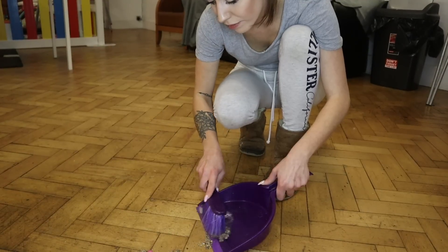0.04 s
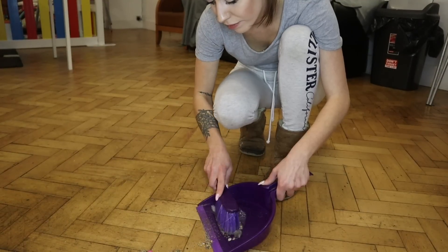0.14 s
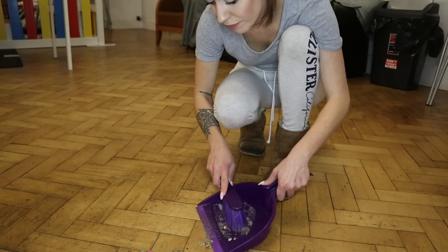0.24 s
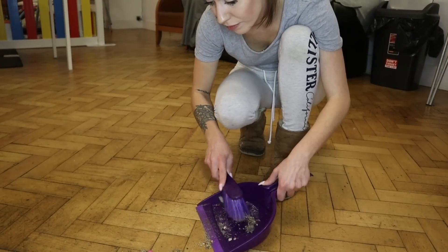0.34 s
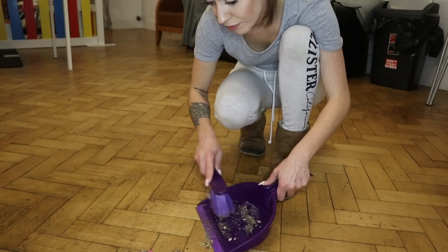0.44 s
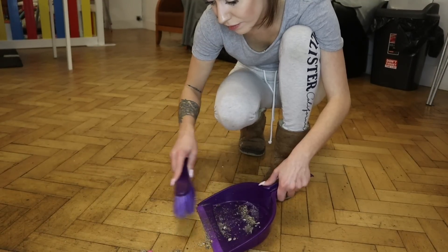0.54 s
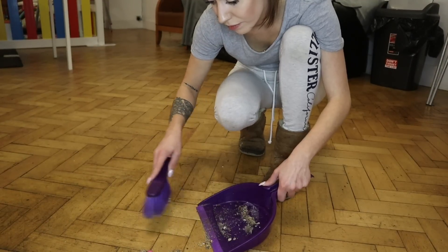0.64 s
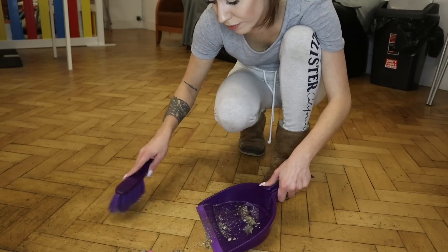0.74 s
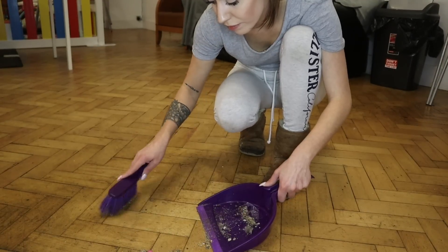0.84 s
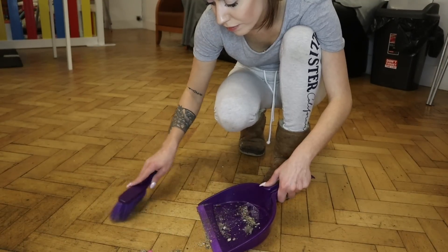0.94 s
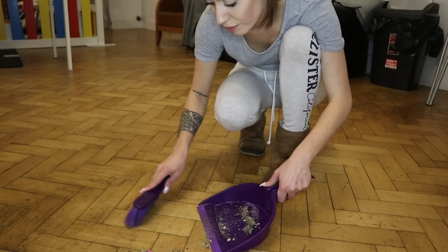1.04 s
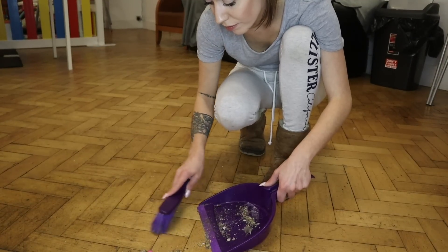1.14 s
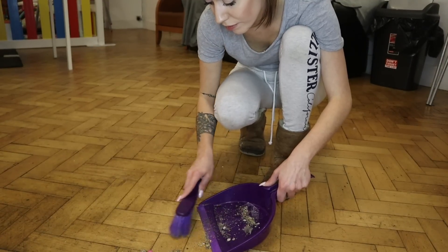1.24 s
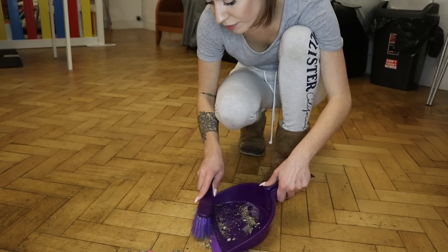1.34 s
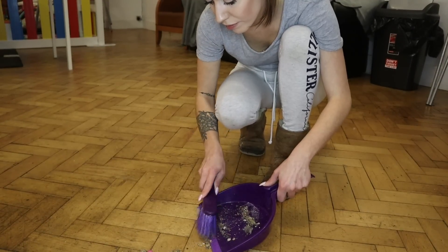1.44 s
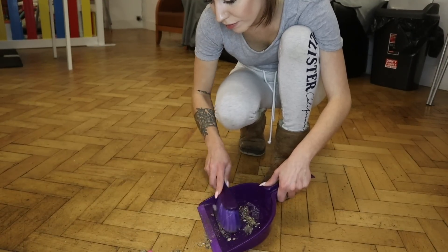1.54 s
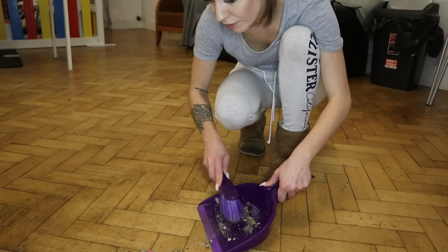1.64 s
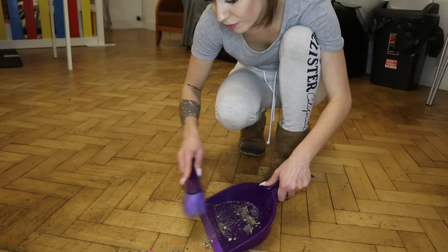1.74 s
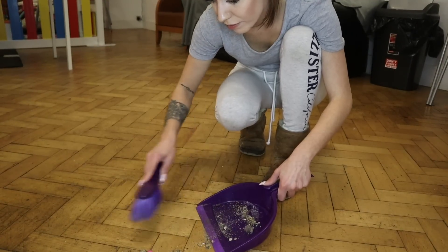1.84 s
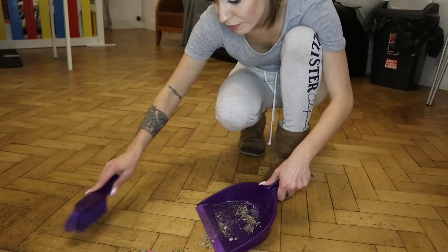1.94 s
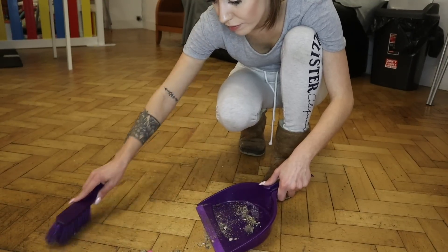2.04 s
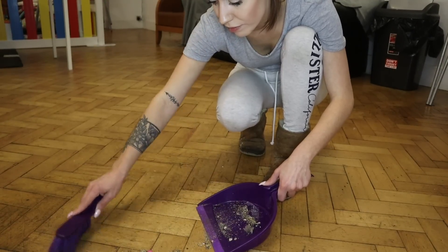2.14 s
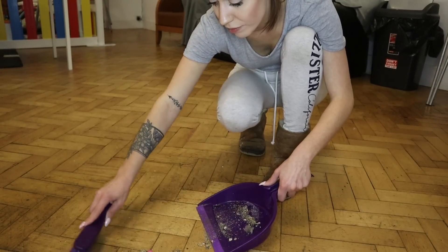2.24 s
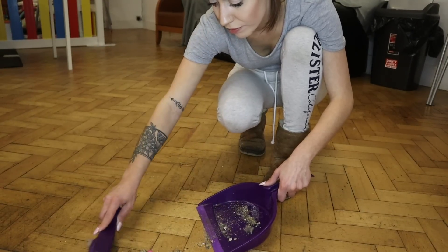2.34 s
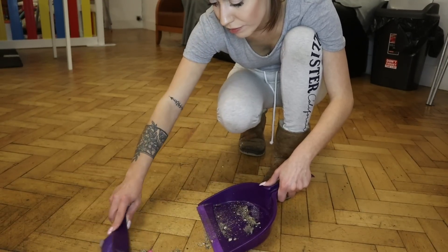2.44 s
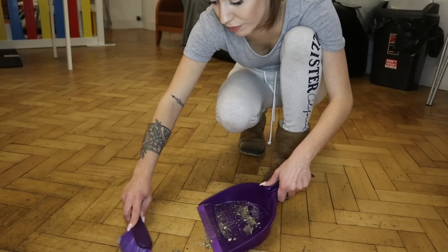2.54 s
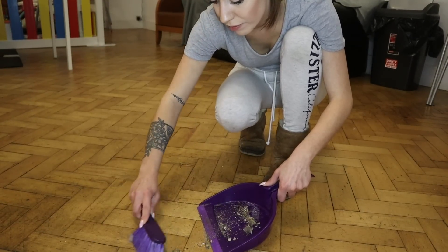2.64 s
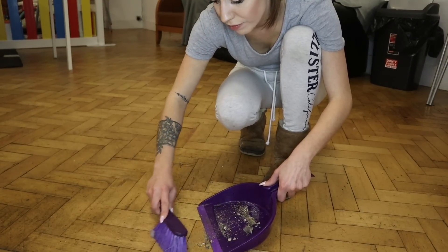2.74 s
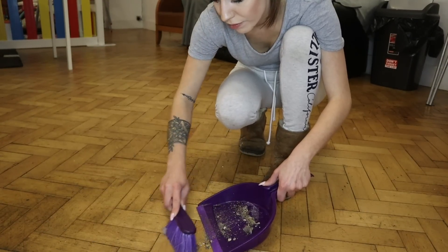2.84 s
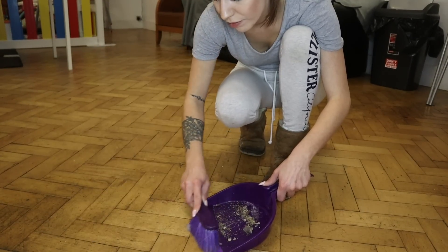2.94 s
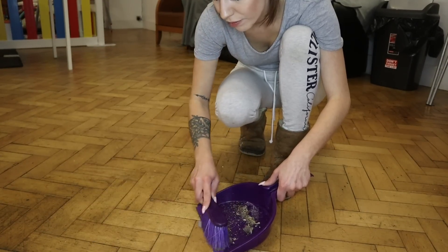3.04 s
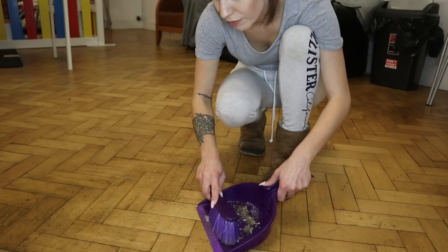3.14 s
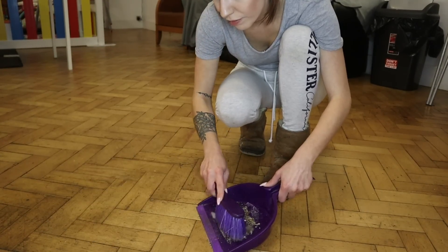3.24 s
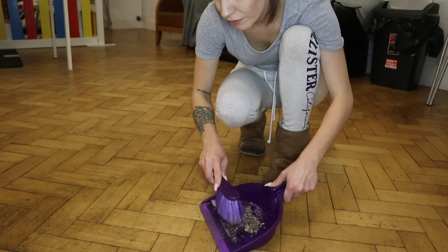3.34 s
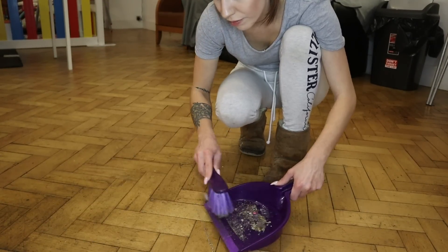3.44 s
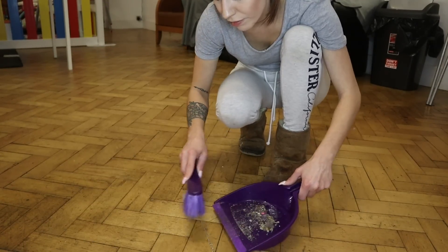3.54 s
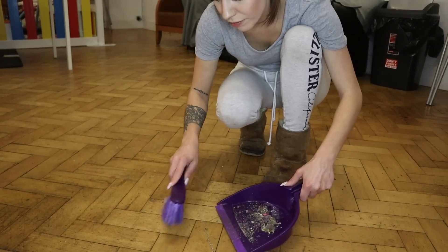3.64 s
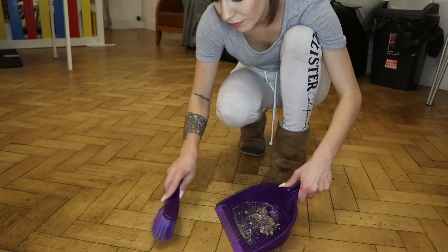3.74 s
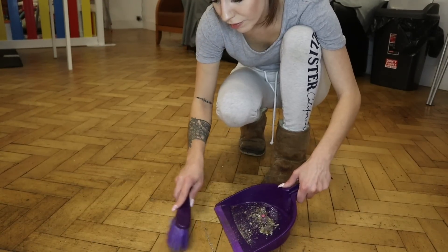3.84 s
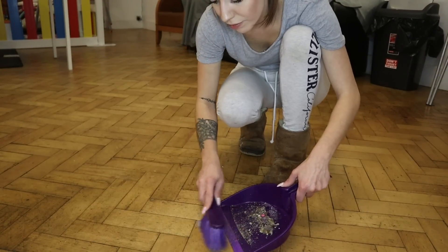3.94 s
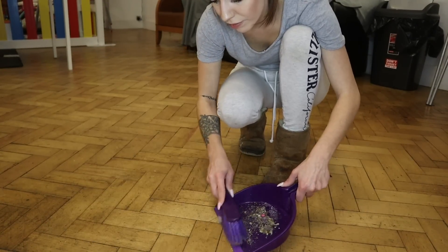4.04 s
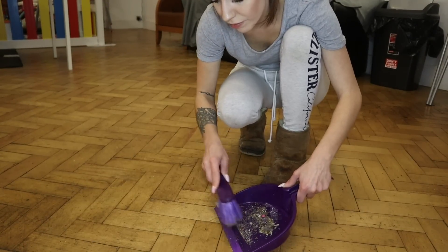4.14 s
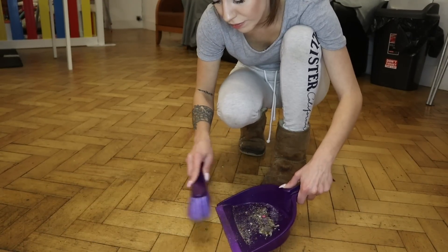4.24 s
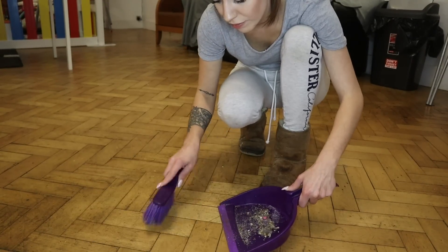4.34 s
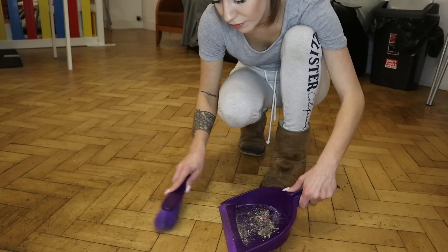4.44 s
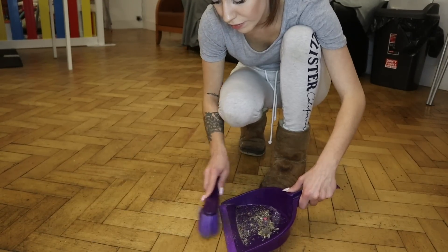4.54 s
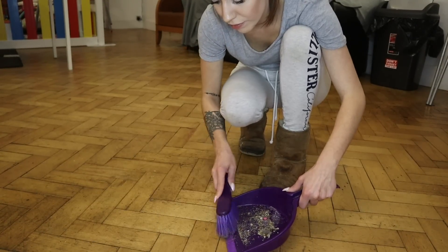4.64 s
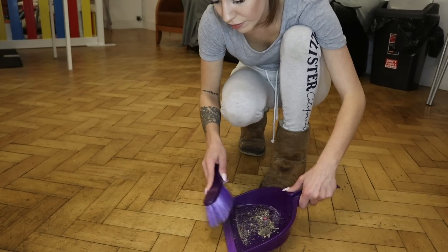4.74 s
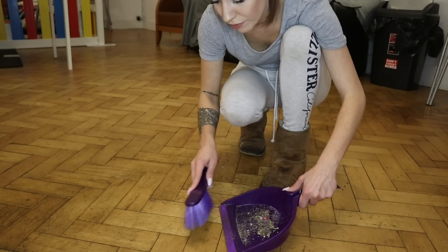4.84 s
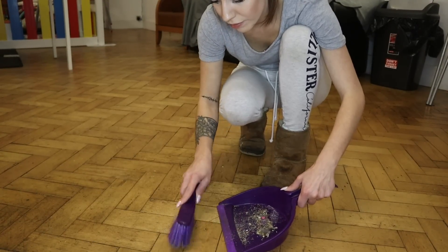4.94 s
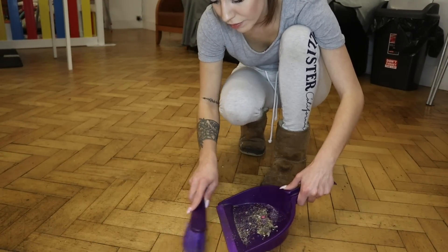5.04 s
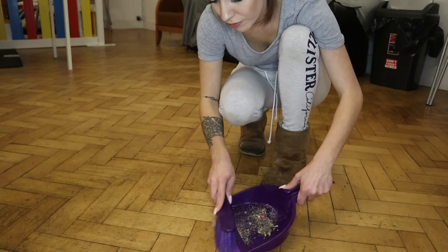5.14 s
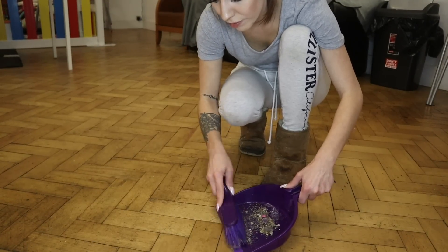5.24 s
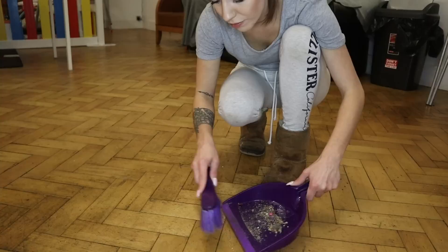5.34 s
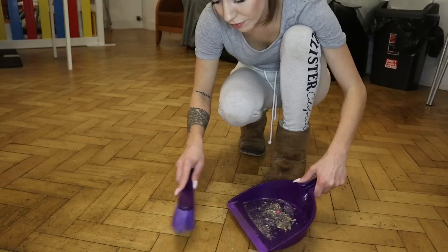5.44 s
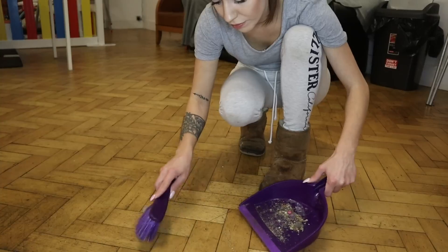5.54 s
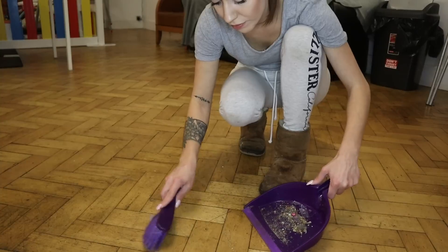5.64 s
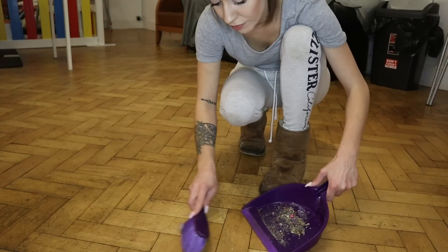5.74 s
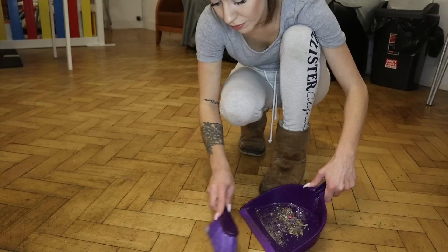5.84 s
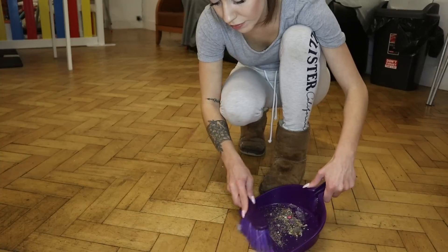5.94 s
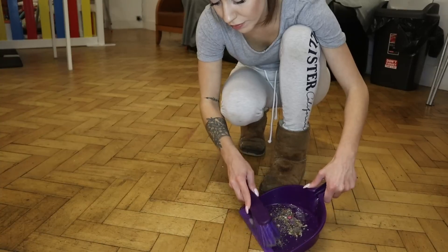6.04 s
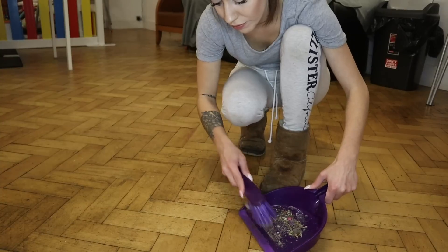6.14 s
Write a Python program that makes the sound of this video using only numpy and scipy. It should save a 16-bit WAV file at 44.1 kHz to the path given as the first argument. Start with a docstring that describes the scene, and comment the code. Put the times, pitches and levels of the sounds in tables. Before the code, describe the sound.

A hand brush sweeps grit across a wooden floor in brisk hissing strokes and flicks it, ticking, into a plastic dustpan.

```python
"""A hand brush sweeps grit over a parquet floor into a plastic dustpan, close by, in a fairly live room.
Each brisk stroke lands with a pat, hisses along the wood and flicks over the lip of the pan: trains of random
clicks, coloured and swelled by the hand. Inside the pan, bristles scrape and grit ticks on the plastic: clicks
and pulses that ring its modes. Far off, an engine drones faintly in the street: sine tones of falling pitch,
over a murmur and a steady hiss of filtered noise."""
import sys
import numpy as np
from scipy import signal
from scipy.fft import rfft, irfft, next_fast_len
from scipy.io import wavfile
from scipy.ndimage import map_coordinates

SR = 44100
rng = np.random.default_rng(int(sys.argv[2]) if len(sys.argv) > 2 else 0)


def wrap_up_sound(samples):
    """Save the sound to the file named by the first command line argument, as 16-bit audio."""
    columns = np.atleast_2d(samples).T
    # keep every value between -1 and 1, then stretch to whole-number steps
    tamed = np.clip(columns, -1, 1)
    steps = np.round(tamed * 32767).astype(np.int16)
    wavfile.write(sys.argv[1], SR, steps)


N = 272538
TIME = np.arange(N) / SR

# strokes inside the pan, levels before trim: enter_s, hardest_push_s, leave_s, scrape_db, boom_db
PAN_STROKES = [(0.0, 0.17, 0.32, -30, -58), (1.39, 1.43, 1.426, -36.5, -52.5),
               (1.51, 1.622, 1.7, -36.5, -53), (3.06, 3.087, 3.15, -29, -50),
               (3.145, 3.244, 3.47, -28.5, -52)]
# modes of the plastic pan: mode_hz, width_hz, level_db
PAN_MODES = [(740, 125, -1), (1510, 230, -1), (1770, 120, -4), (2110, 130, -4), (2780, 170, -2),
             (3590, 190, -4), (4870, 220, -6)]
# colour of bristles and crumbs on the plastic: frequency_hz, level_db
FLICK_COLOUR = [(500, -34), (1400, -7.5), (3000, -4.5), (4200, -4.5), (6800, -4), (8500, -9.5),
                (12000, -7.5), (15500, -31.5)]
# stereo width of the brush, near the microphones: frequency_hz, side_minus_mid_db
NEAR_WIDTH = [(100, -10.5), (300, -14.5), (700, -26), (1400, -4.5), (4500, -2.5), (12000, -3)]
# stereo width of room and background, far from the microphones: frequency_hz, side_minus_mid_db
FAR_WIDTH = [(50, -48), (130, -17), (380, -6), (700, -4), (1400, -0.5), (8000, 11.5)]
ENTER_S = 0.0011  # the bristles meet the plastic


def floor_strokes(land_s=0.00045, relax_s=0.017, lift_s=0.037, bend_range_db=4, hiss_growth=0.52):
    """Bristles rub the wood and roll grit, most as the hand bears down; their tips hiss more with speed."""
    # strokes along the floor, levels before trim:
    # land_s, lift_s, bear_down_s, rub_at_end_of_bearing_down_db, light_drag_rub_db, full_speed_hiss_db
    stroke_table = [(0.944, 1.436, 0.1, -44, -45, -42), (2.126, 3.08, 0.17, -39.5, -45, -44.5),
                    (3.821, 4.208, 0.15, -38.5, -45.5, -40), (4.499, 4.77, 0.054, -39, -47.5, -36.5),
                    (5.056, 5.326, 0.066, -55, -45.5, -40.5), (5.678, 6.168, 0.26, -48, -65, -38)]
    # the tufts drag harder over a rough patch of wood: time_s, rub_db (before trim), half_length_s
    drag_table = [(2.306, -36.5, 0.026), (4.563, -43, 0.02), (5.161, -38.5, 0.027), (5.334, -37.5, 0.032),
                  (5.737, -39, 0.022), (5.876, -45.5, 0.04)]
    # colour of the rub on wood: frequency_hz, level_db
    rub_colour = [(150, -14), (350, 0.5), (750, 5), (1100, -1), (1650, 2.5), (3000, -2.5), (5000, -6),
                  (9000, -29.5)]
    # colour of the bristle tips: frequency_hz, level_db
    hiss_colour = [(1000, -25), (2500, 4.5), (4000, 2), (6500, 4.5), (8000, 2.5), (11500, 5), (13500, -6),
                   (15500, -17)]
    pressure, speed = 0, 0
    for land, lift, press_s, press_db, drag_db, hiss_db in stroke_table:
        contact = held(land, lift, land_s, lift_s)
        # the rub grows as the tufts bend under the hand
        bend_db = bend_range_db * np.clip((TIME - land) / press_s - 1, -1, 0)
        pressed = from_db(press_db + bend_db) * held(land, land + press_s, land_s, relax_s)
        pressure += np.hypot(pressed, from_db(drag_db) * contact)
        stroke_done = np.clip((TIME - land) / (lift - land), 0, 1)
        speed += from_db(hiss_db) * contact * stroke_done ** hiss_growth
    for s, db, half in drag_table:
        pressure += from_db(db) * np.exp(-np.minimum(((TIME - s) / half) ** 2, 20))

    rub = shifting(spread(slips(per_s=4000, size_db=2.0), NEAR_WIDTH, rub_colour))
    rub = rub * from_db(2.1 * drift(70))
    grit = spread(slips(per_s=260, size_db=2.5) * from_db(4 * drift(30)), NEAR_WIDTH, rub_colour)
    rub = rms_one(rub + from_db(-3) * grit)
    hiss = spread(slips(per_s=14000, size_db=1.5), NEAR_WIDTH, hiss_colour) * from_db(1.0 * drift(42))
    return from_db(-3.0) * rub * pressure + from_db(-3.0) * hiss * speed


def pan_strokes(scrape_ease_db_per_s=47, boom_ease_db_per_s=2):
    """Bristles push grit over the shell, which rings and booms in fits; loose crumbs rattle on it."""
    # colour of the booming pan: frequency_hz, level_db
    boom_colour = [(200, -45), (450, -10), (690, -2), (1050, -12), (1550, -1.5), (2800, -40)]
    # colour of bristles and grit scraping on plastic: frequency_hz, level_db
    scrape_colour = [(550, -18), (1350, -2.5), (2300, -4), (3500, -2), (5000, -13), (8000, -13),
                     (11500, -14.5), (15500, -50)]
    scraping = sum(from_db(db) * push(*times, scrape_ease_db_per_s) for *times, db, _ in PAN_STROKES)
    booming = sum(from_db(db) * push(*times, boom_ease_db_per_s) for *times, _, db in PAN_STROKES)

    grit = slips(per_s=1500, size_db=-1.5) * from_db(2.9 * drift(90))
    crumbs = slips(per_s=190, size_db=3.0)
    scrape = shifting(spread(grit + from_db(-2.0) * hollow(grit), NEAR_WIDTH, scrape_colour))
    rattle = spread(crumbs + ring(crumbs, PAN_MODES), NEAR_WIDTH, FLICK_COLOUR)
    scrape = scrape + from_db(-2.5) * rattle
    boom = shifting(spread(slips(per_s=900, size_db=3.0), NEAR_WIDTH, boom_colour))
    boom = rms_one(boom * from_db(3.5 * drift(40)))
    return from_db(-2.5) * scrape * scraping + from_db(10.0) * boom * booming


def push(enter, hardest, leave, ease_db_per_s, push_db_per_s=78, leave_s=0.039):
    """Force of one stroke in the pan: it grows up to the hardest push, eases and lets go."""
    db = np.minimum((TIME - hardest) * push_db_per_s, (hardest - TIME) * ease_db_per_s)
    return from_db(db) * held(enter, leave, ENTER_S, leave_s)


def hollow(x, mouth_hz=1080, back_hz=1680, travel_s=0.095, width_hz=300):
    """The hollow under the brush rises in pitch as each stroke travels from the mouth of the pan to its back."""
    enters = np.array([row[0] for row in PAN_STROKES])
    out, state, size = np.zeros_like(x), np.zeros((2, 2)), 128
    for i in range(0, N, size):
        inside_s = i / SR - enters[enters <= i / SR].max(initial=0)
        hz = back_hz + (mouth_hz - back_hz) * np.exp(-inside_s / travel_s)
        block = x[:, i:i + size]
        out[:, i:i + size], state = signal.lfilter(*resonance(hz, width_hz), block, zi=state)
    return out


def flicks(meet_s=0.078, meet_db=-14.0, fall_s=0.019):
    """The tufts rustle as they meet the lip, then spring free in a quick, fine-grained, bright swell."""
    # bristles flick over the lip: time_s, level_db, rise_s
    flick_table = [(0.189, -24, 0.03), (1.556, -33, 0.034), (1.626, -31, 0.018), (3.06, -39, 0.035),
                   (3.269, -25.5, 0.036), (4.143, -25.5, 0.031), (4.75, -24.5, 0.019),
                   (5.308, -29.5, 0.039), (6.115, -28, 0.036)]
    swell = 0
    for s, db, rise in flick_table:
        spring = np.exp(-np.minimum(np.maximum((s - TIME) / rise, (TIME - s) / fall_s), 20))
        rustle = from_db(meet_db) * held(s - meet_s, s, ENTER_S, fall_s)
        swell = swell + from_db(db) * np.maximum(spring, rustle)
    tufts = slips(per_s=16000, size_db=1.5)
    return swell * spread(tufts, NEAR_WIDTH, FLICK_COLOUR)


def pats(reach=2.35, side_db=-8.5, level_db=-10.0, tips_db=-19.5):
    """Many bristle ends touch down within milliseconds, a burst of noise that shakes the pan on the floor."""
    # the brush pats the floor or the pan: time_s, level_db (before trim), centre_hz, length_s
    pat_table = [(0.079, -26, 2060, 0.0037), (0.169, -18.5, 4500, 0.008), (0.21, -15, 2550, 0.0073),
                 (0.9612, -18, 1740, 0.0066), (1.407, -24, 2540, 0.0066), (1.604, -25.5, 2200, 0.024),
                 (2.146, -21.5, 1320, 0.011), (3.805, -25.5, 1210, 0.01), (3.815, -28, 1800, 0.021),
                 (3.889, -24.5, 1360, 0.014), (3.933, -30.5, 1810, 0.015), (4.504, -15.5, 1970, 0.0064),
                 (4.545, -33, 1800, 0.008), (5.074, -21, 1040, 0.013), (5.698, -25, 1930, 0.023),
                 (5.714, -26.5, 485, 0.017)]
    out, t = np.zeros((2, N)), TIME[:SR // 20]
    for s, db, hz, length in pat_table:
        burst = rng.choice([-1, 1], (2, len(t))) * (t / length) ** 2 * np.exp(-5.5 * t / length)
        body = from_db(-3) * ring(band(burst, 400, 1.5 * hz), PAN_MODES)
        tips = from_db(tips_db) * np.sqrt(hz / 1700) * band(burst, 3400, 9700)
        mid, side = band(burst, hz / reach, hz * reach) + tips + body
        pat = mid + from_db(side_db) * side * np.array([[1], [-1]])
        loudness = np.sqrt(np.sum(mid ** 2) / (length * SR))
        add(out, from_db(db + level_db) * pat / loudness, s)
    return out


def knocks(contact_s=0.0012, rattle_db=-10.5, low_hz=520, high_hz=3000,
           spot_width_hz=130, spot_db=5.5, dry_db=-5.0):
    """A blunt, slightly rattling contact drives the modes of the pan and the pitch of the struck spot."""
    # the brush stock bumps the pan and sets it ringing: time_s, peak_db, spot_hz
    knock_table = [(3.055, -17, 806), (3.068, -19, 735), (3.086, -17, 1480), (3.115, -21.5, 1800),
                   (3.141, -11, 1490), (3.152, -24, 1570), (3.170, -19.5, 730), (3.187, -14.5, 2860),
                   (3.19, -17.5, 730), (3.202, -22, 1600)]
    out, t = np.zeros((2, N)), TIME[:SR // 20]
    for s, db, hz in knock_table:
        rattle = rng.choice([-1, 1], (2, len(t))) * (t / contact_s) * np.exp(-t / contact_s)
        blow = band((t == 0) + from_db(rattle_db) * rattle, low_hz, high_hz)
        spot = ring(blow, [(hz, spot_width_hz, spot_db)])
        knock = ring(blow, PAN_MODES) + spot + from_db(dry_db) * blow
        add(out, from_db(db) * knock / np.abs(knock).max(), s)
    return out


def thumps(contact_s=0.00021):
    """Cushioned by its tufts, the stock comes down and the parquet answers with a short, woody note."""
    # the stock thumps on the floor: time_s, peak_db
    thump_table = [(0.2004, -26.5), (3.8085, -21.5), (3.821, -26.5), (5.077, -33), (5.15, -31.5)]
    # modes of the parquet: mode_hz, width_hz, level_db
    floor_modes = [(190, 184, -10), (551, 78, 1), (813, 200, -1.5)]
    t, out = TIME[:SR // 5], np.zeros((2, N))
    note = ring(t * np.exp(-t / contact_s), floor_modes)
    for s, db in thump_table:
        add(out, from_db(db) * note[None] / np.abs(note).max(), s)
    return out


def ticks(reach=1.7, scatter_db=-13.5, scatter_s=0.0016, ring_db=-30.0, crack_db=-22.0,
          spot_width_hz=450, spot_db=-6.0, level_db=0.5):
    """A hard contact is one sharp pulse, scattered at once by the pan walls; the struck spot rings briefly."""
    # the larger grit ticks on the plastic and the wood: time_s, peak_db (before trim), centre_hz
    tick_table = [(0.0226, -27, 2900), (0.0914, -13.5, 3130), (0.1432, -11, 4300), (0.1553, -13, 5500),
                  (0.1845, -1, 3630), (0.201, 0, 2100), (0.283, -6, 3070), (0.296, -19, 3080),
                  (0.3841, -20, 3400), (0.517, -25, 2400), (0.5237, -27, 1730), (0.5345, -24, 2300),
                  (1.3987, -18, 3640), (1.4595, -26, 3980), (1.544, -20, 4490), (1.5544, -18, 4900),
                  (1.6245, -18, 3740), (1.6308, -8.5, 3300), (1.6562, -13.5, 3500), (1.683, -21, 2600),
                  (2.6963, -21.5, 3280), (2.8364, -22.5, 2900), (2.8466, -24.5, 2400),
                  (2.8702, -17.5, 3000), (2.8759, -22, 3290), (3.1625, -17, 2800), (3.172, -10, 3700),
                  (3.373, -22, 3200), (3.4285, -25, 3600), (3.551, -27, 1500), (3.6798, -30, 2300),
                  (3.7299, -26, 3300), (4.993, -22, 2900), (5.0102, -29, 4500), (5.7252, -12, 2300),
                  (6.1643, -19.5, 4540)]
    out, t = np.zeros((2, N)), TIME[:SR // 20]
    for s, db, hz in tick_table:
        scatter = rng.choice([-1, 1], (2, len(t))) * np.exp(-t / scatter_s)
        scatter = scatter * np.minimum(2 * t / scatter_s, 1)
        pulse = (t == 0) + from_db(scatter_db) * scatter
        crack = from_db(crack_db) * (hz / 3000) ** 2 * band(pulse, 7100, 9800)
        spot = ring(pulse, [(hz, spot_width_hz, spot_db)])
        tick = band(pulse, hz / reach, hz * reach) + crack
        tick = tick + from_db(ring_db) * ring(pulse, PAN_MODES) + spot
        add(out, from_db(db + level_db) * tick / np.abs(tick.mean(axis=0)).max(), s)
    return out


def shifting(x, spots_per_s=16, spot_colour_db=3.0):
    """Each spot of wood or plastic under the brush favours other pitches, so the colour keeps shifting."""
    edges = np.geomspace(350, 4400, num=12)
    change = 0
    for low, high in zip(edges, edges[1:]):
        change = change + band(x, low, high) * (from_db(spot_colour_db * drift(spots_per_s)) - 1)
    return rms_one(x + change)


def slips(per_s, size_db):
    """Bristles catch and let go at random: two trains of tiny clicks of uneven size and random sign."""
    sizes = from_db(size_db * np.minimum(rng.exponential(1, (2, N)), 5))
    return rms_one((rng.random((2, N)) < per_s / SR) * sizes * rng.choice([-1, 1], (2, N)))


def placed(x, pan_db=1.15, lead_s=2e-5):
    """The side nearer to the brush hears it louder and a little sooner."""
    # where the brush is: time_s, place (-1 far out on the left .. 1 at the pan, on the right)
    place_table = [(0.4, 1), (0.95, -1.15), (1.55, 0.99), (2.25, -0.81), (2.65, -1.44), (3.15, 1),
                   (3.8, 0.78), (6.1, 0.66)]
    place = np.interp(TIME, *np.transpose(place_table))
    channels = []
    for side, channel in zip((-1, 1), x):
        heard = map_coordinates(channel, [(TIME + side * lead_s * place) * SR], order=3)
        channels.append(from_db(side * pan_db * place) * heard)
    return np.array(channels)


def room(x, gap_s=0.0013, treble_db=-6.0):
    """Diffuse reflections, as decaying noise, build up after a short gap; the treble returns weaker."""
    # room decay: frequency_hz, t60_s
    decay_table = [(200, 0.79), (1500, 1), (4000, 0.66), (12000, 0.92)]
    t, edges, tail = TIME[:SR], np.geomspace(100, 16000, num=9), 0
    for low, high in zip(edges, edges[1:]):
        hz = np.sqrt(low * high)
        gain = from_db(at_hz([(2500, 0), (11000, treble_db)], hz))
        decay = np.exp(-np.log(1000) * t / at_hz(decay_table, hz))
        tail = tail + gain * band(rng.standard_normal((2, SR)), low, high) * decay
    response = spread(tail * (1 - np.exp(-(t / gap_s) ** 2)), FAR_WIDTH) / np.sqrt(SR)
    return signal.fftconvolve(x, response, axes=1)[:, :N]


def engine():
    """An engine outside slowly loses speed: a drone with a strong octave and a low throb with a weak one."""
    # the drone swells up for a while: start_s, end_s, level_db
    drone_table = [(1.25, 2.49, -53), (1.33, 1.75, -55.5), (2.08, 2.47, -55.5)]
    # the throb swells up for a while: start_s, end_s, level_db
    throb_table = [(1.8, 3.5, -50.5), (4.3, 5.02, -51), (5.22, 6.1, -49.5)]
    drone = engine_tone(drone_table, hz=63.2, sag_hz_per_s=1.404, overtone_db=9, waver_db=1.8)
    return drone + engine_tone(throb_table, hz=45, sag_hz_per_s=1.1, overtone_db=-7.0, waver_db=1.0)


def engine_tone(swells, hz, sag_hz_per_s, overtone_db, waver_db, swell_s=0.0092, fade_s=0.14):
    """A low engine order and its octave fall in pitch and waver in level."""
    phase = 2 * np.pi * np.cumsum(hz - sag_hz_per_s * TIME) / SR
    tone = np.sin(phase) + from_db(overtone_db) * np.sin(2 * phase)
    level = sum(from_db(db) * held(start, end, swell_s, fade_s) for start, end, db in swells)
    return rms_one(tone) * level * from_db(waver_db * drift(8))


def street_murmur(level_db=-49):
    """The murmur of the street is coloured noise that swells and sinks."""
    # rise and fall of the murmur: time_s, level_db (relative)
    traffic_table = [(0.9, -0.5), (1.6, 3.5), (2.6, 4.5), (3.7, 1.5), (6.1, 4)]
    # colour of the murmur: frequency_hz, level_db
    street_colour = [(28, -11.5), (70, -4), (160, -7.5), (300, -8.5), (500, -10.5), (850, -9.5),
                     (1400, -12.5), (2300, -17.5), (4600, -29), (11000, -47)]
    murmur = spread(rng.standard_normal((2, N)), FAR_WIDTH, street_colour)
    return from_db(level_db + np.interp(TIME, *np.transpose(traffic_table))) * murmur


def room_air(level_db=-53.5):
    """The quiet room hisses steadily: coloured noise."""
    # colour of the hiss: frequency_hz, level_db
    air_colour = [(1200, 1.5), (2500, -1), (4600, -4), (11000, -13), (15000, -50)]
    return from_db(level_db) * spread(rng.standard_normal((2, N)), FAR_WIDTH, air_colour)


def from_db(db):
    """Decibels to gain."""
    return 10 ** (np.asarray(db) / 20)


def rms_one(x):
    """Scale to an rms of 1."""
    return x / np.sqrt(np.mean(x ** 2) + 1e-20)


def at_hz(points, hz):
    """Read a table on a log-frequency axis."""
    f, value = np.transpose(points)
    return np.interp(np.log(np.maximum(hz, 1)), np.log(f), value)


def drift(rate):
    """Random wander with a spread of about 1, through a new value so many times a second."""
    knots = rng.standard_normal(4000)
    return np.interp(TIME * rate, np.arange(len(knots)), knots)


def held(start, end, attack_s, release_s):
    """Attack, hold, release."""
    rise = 1 - np.exp(-np.maximum(TIME - start, 0) / attack_s)
    return rise * np.exp(-np.clip((TIME - end) / release_s, 0, 20))


def band(x, low_hz, high_hz):
    """Causal band-pass."""
    edges = [low_hz, min(high_hz, SR / 2 - 2000)]
    return signal.sosfilt(signal.butter(2, edges, "band", fs=SR, output="sos"), x)


def resonance(hz, width):
    """Filter of one resonance, with a gain of 1 on top."""
    r = np.exp(-np.pi * width / SR)
    return (1 - r * r) / 2 * np.array([1, 0, -1]), [1, -2 * r * np.cos(2 * np.pi * hz / SR), r * r]


def ring(x, modes):
    """A body answers in its damped modes, which alternate in sign."""
    out = 0
    for k, (hz, width, db) in enumerate(modes):
        out = out + (-1) ** k * from_db(db) * signal.lfilter(*resonance(hz, width), x + 1e-18)
    return out


def spread(pair, width, spectrum=None):
    """Two unrelated signals become left and right, with a width and a colour by frequency."""
    size = next_fast_len(pair.shape[1])
    hz = np.fft.rfftfreq(size, 1 / SR)
    mid, side = rfft(pair, size)
    share = from_db(at_hz(width, hz))
    gain = 1 / np.sqrt(1 + share ** 2)
    if spectrum is not None:
        low_cut = np.minimum(hz / spectrum[0][0], 1) ** 2  # below the first point of the colour
        gain = gain * low_cut * from_db(at_hz(spectrum, hz))
    left_right = gain * np.array([mid + share * side, mid - share * side])
    return rms_one(irfft(left_right, size)[:, :pair.shape[1]])


def add(out, sound, s):
    """Mix a short sound in at time s."""
    start = max(int(s * SR), 0)
    out[:, start:start + sound.shape[1]] += sound[:, :N - start]


def scene():
    """Brush and pan in the room, over the background."""
    sweep = floor_strokes() + pan_strokes() + flicks()
    blows = pats() + knocks() + thumps() + ticks()
    brush = placed(sweep + blows) + room(from_db(-10.5) * sweep + from_db(-7.5) * blows)
    return brush + engine() + street_murmur() + room_air()


def record(dry, cutoff_hz=15800):
    """Peaks clip at full scale, then a steep low-pass cuts the top."""
    low_pass = signal.ellip(10, .1, 80, cutoff_hz, fs=SR, output="sos")
    return signal.sosfilt(low_pass, np.clip(dry, -1, 1))


dry = scene()
out = record(dry)
wrap_up_sound(out)
```